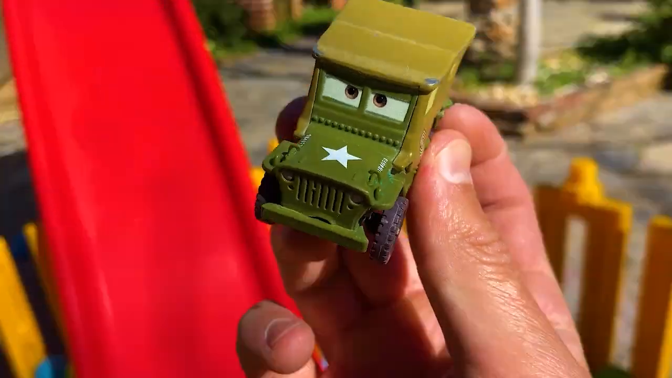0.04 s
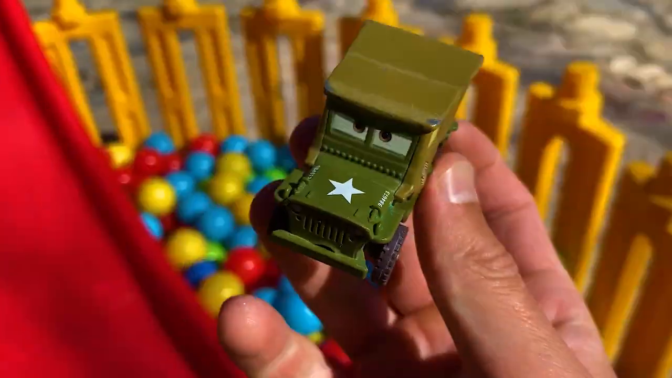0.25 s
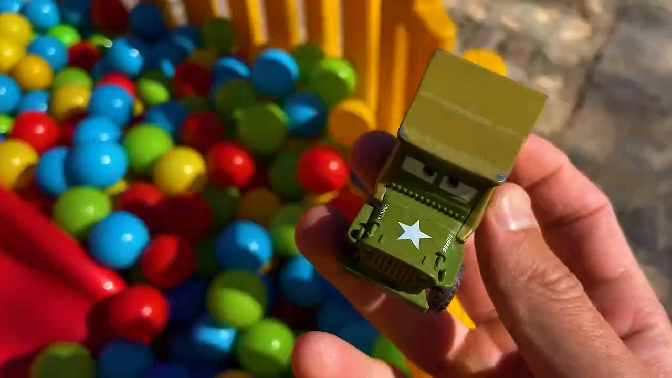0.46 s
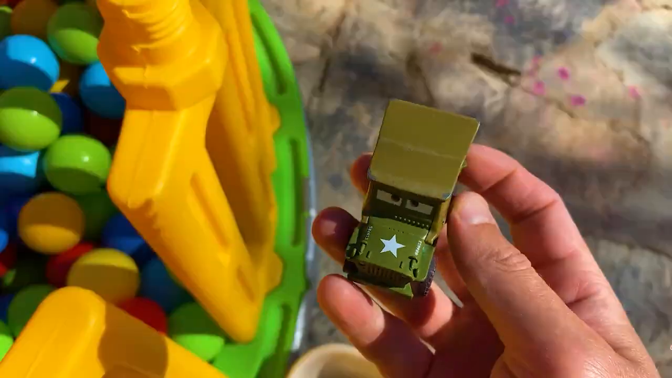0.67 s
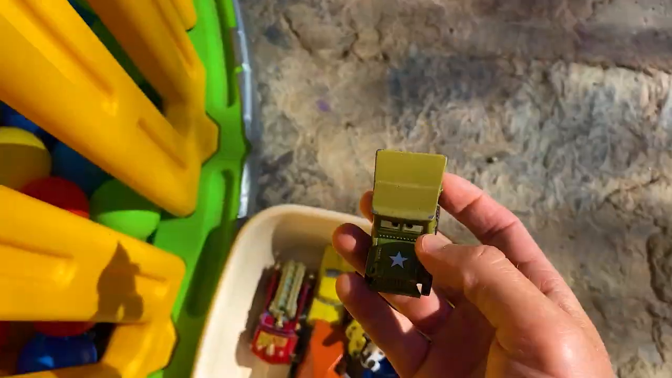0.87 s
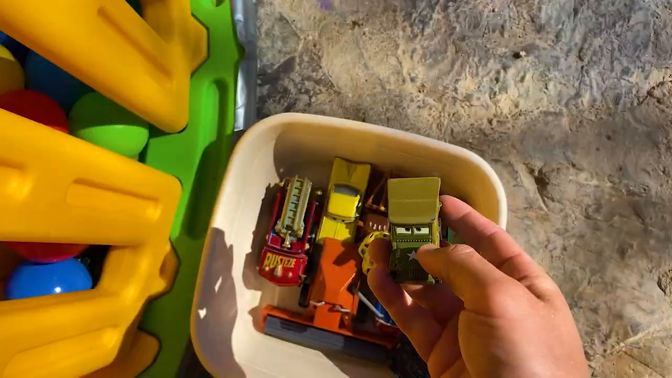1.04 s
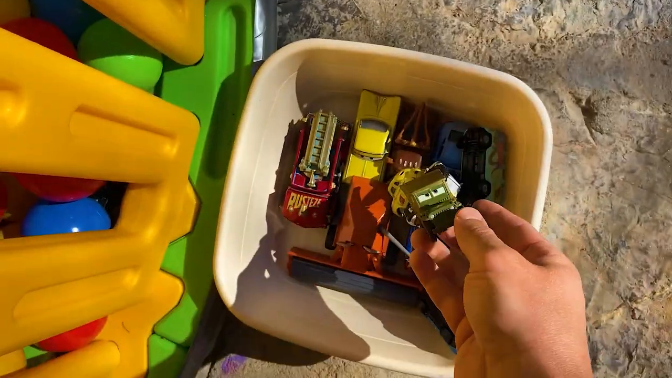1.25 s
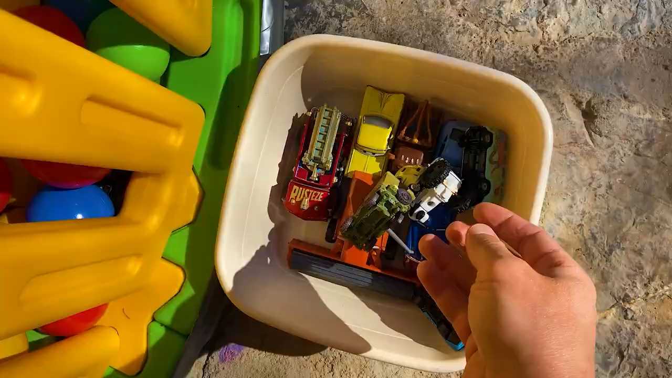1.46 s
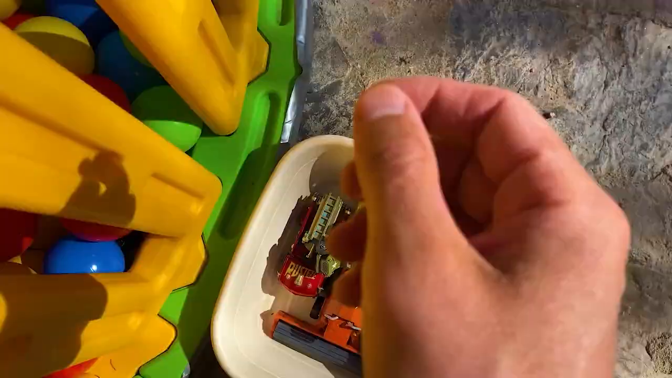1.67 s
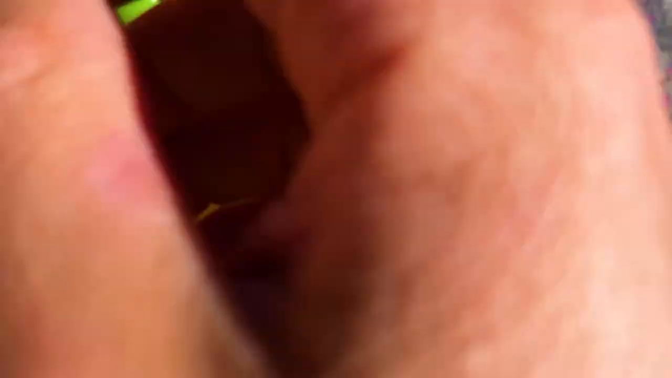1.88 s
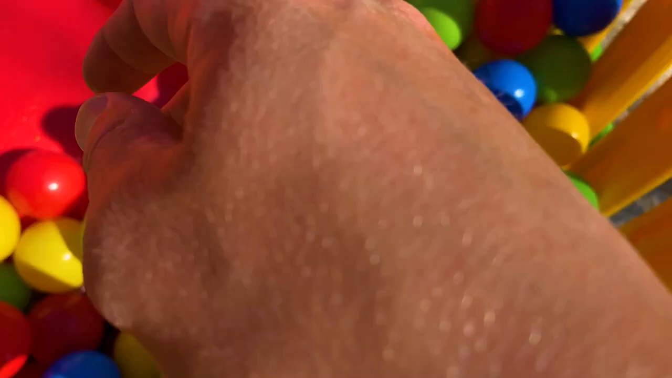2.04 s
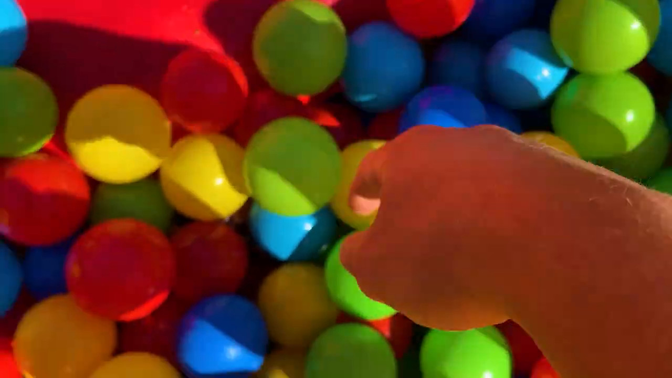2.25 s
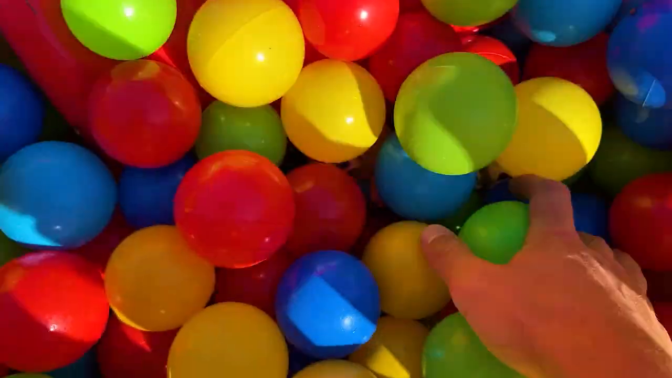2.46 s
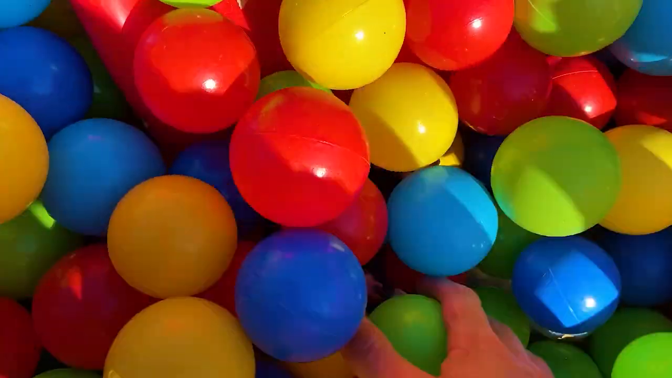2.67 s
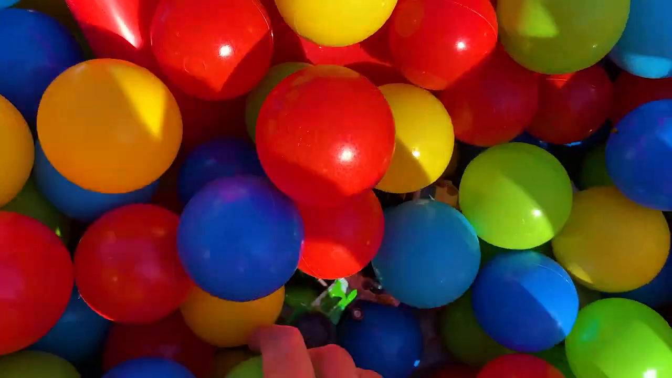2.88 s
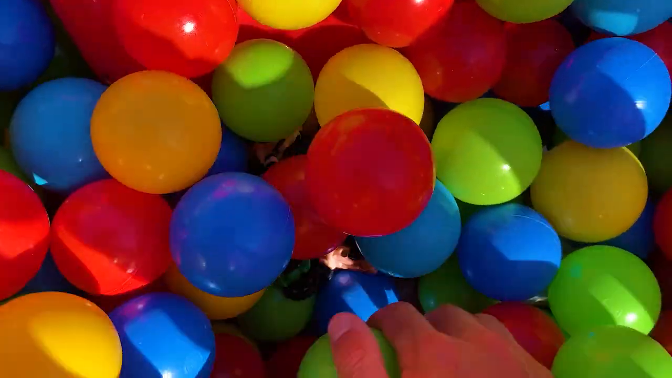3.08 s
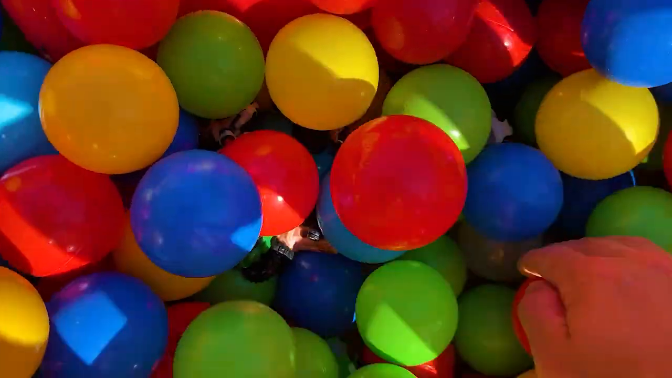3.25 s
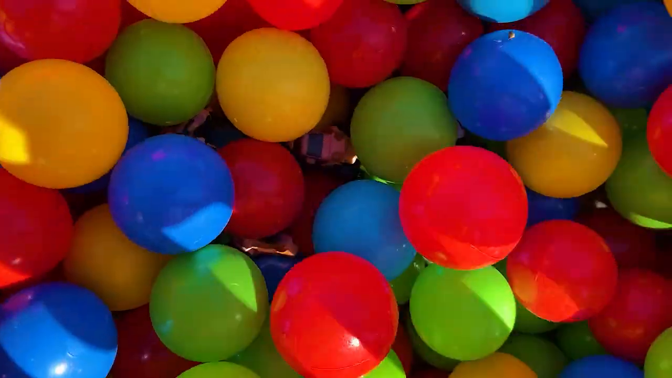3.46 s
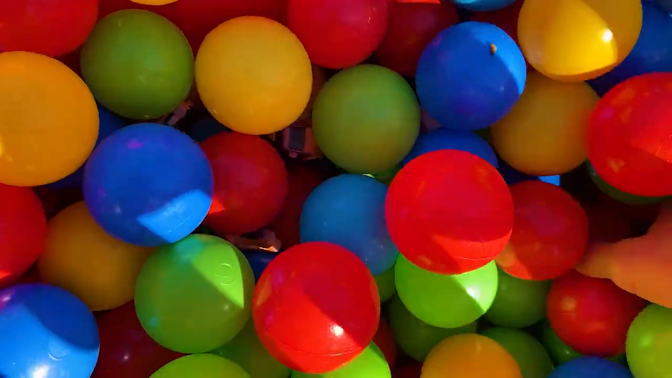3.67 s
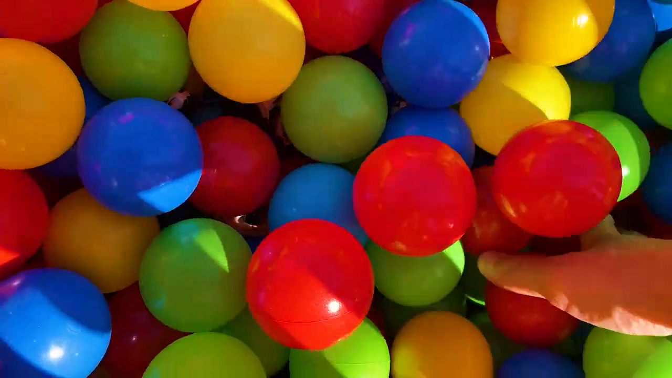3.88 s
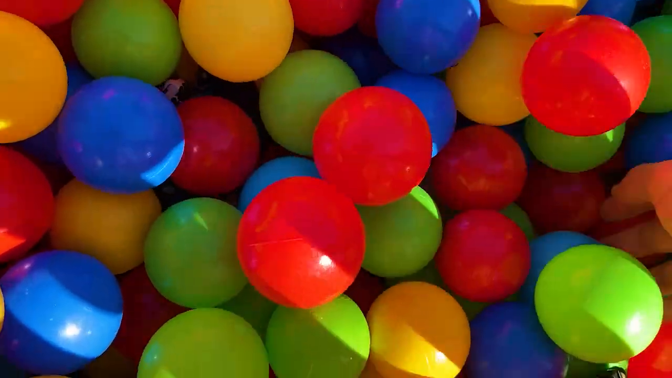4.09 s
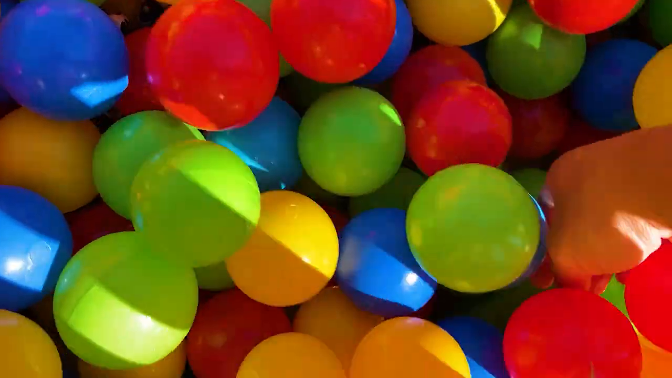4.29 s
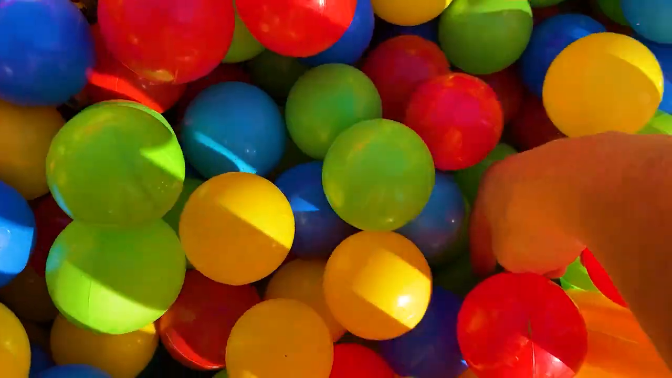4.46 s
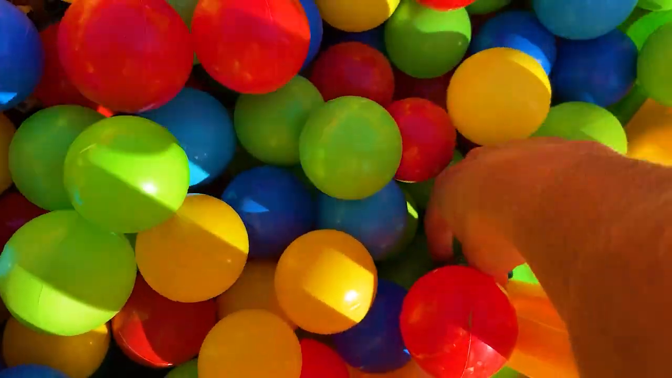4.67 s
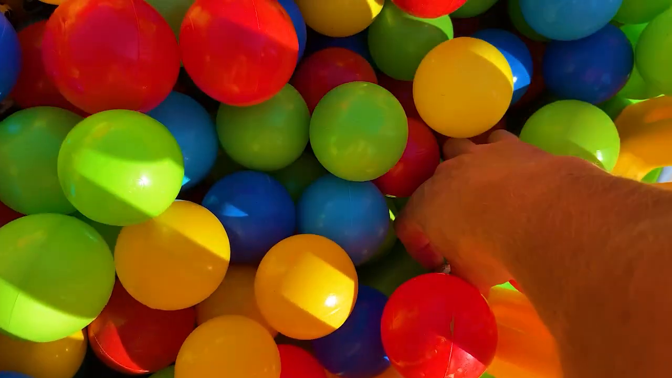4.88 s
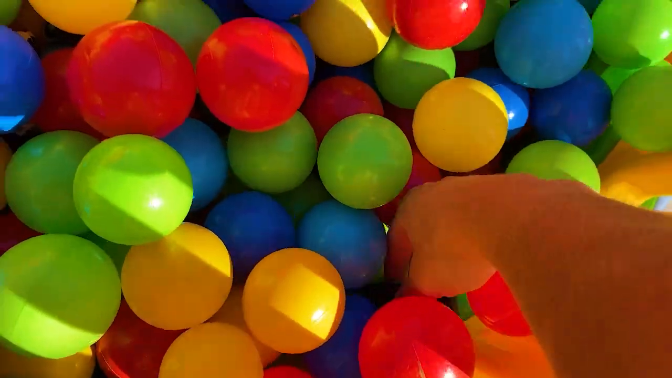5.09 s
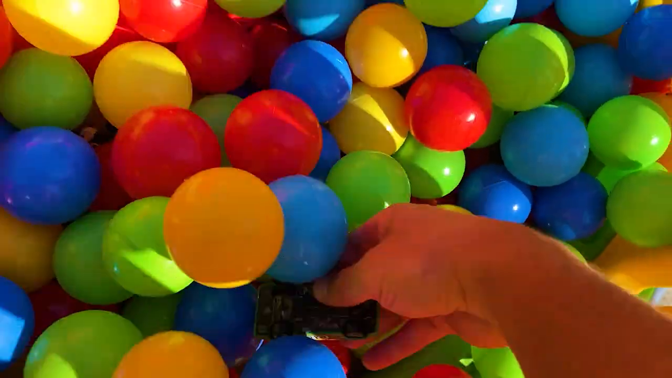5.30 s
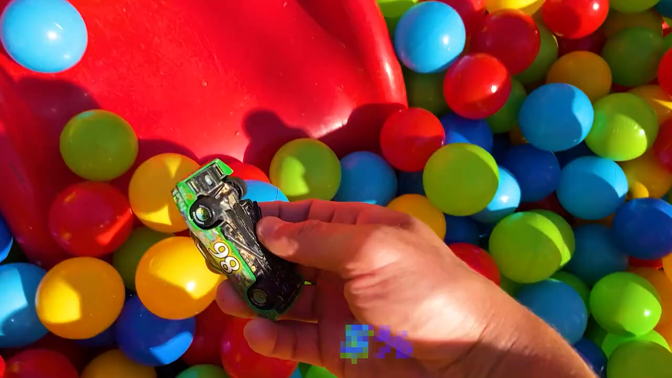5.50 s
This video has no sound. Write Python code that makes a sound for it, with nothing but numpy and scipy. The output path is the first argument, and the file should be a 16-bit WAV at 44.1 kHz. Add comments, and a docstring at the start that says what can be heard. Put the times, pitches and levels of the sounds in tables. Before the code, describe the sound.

A small metal toy car clatters into a plastic tub of others, then a hand rummages through knocking hollow plastic balls outdoors.

```python
"""Toy cars and a ball pit outdoors

Outdoors, close to the microphone, a die-cast toy car is turned in the fingers and dropped among others
in a plastic tub: blows are fading noise bands coloured by the tub, with clean decaying sines for metal.
Then a hand digs through a pit of hollow plastic balls: random contacts make them jostle and scuff,
single blows knock and ring, and wavering tones give short high rings and squeaks. Soft bumps, light wind
on the microphone, handling rumble and a faint outdoor hiss are shaped from the same stereo noise."""
import sys
import numpy as np
from scipy import signal
from scipy.fft import rfft, irfft, next_fast_len
from scipy.io import wavfile
from scipy.ndimage import uniform_filter1d

SR = 44100
rng = np.random.default_rng(int(sys.argv[2]) if len(sys.argv) > 2 else 0)


def store_wav(level_fs):
    """Save 16-bit WAV to argv[1]."""
    pcm = np.round(np.clip(np.atleast_2d(level_fs), -1, 1) * 32767)
    wavfile.write(sys.argv[1], SR, pcm.T.astype(np.int16))


N = 244040
TIME = np.arange(N) / SR
RING_S = .25  # longest stretch kept of any single blow
AGE = TIME[:int(RING_S * SR)]  # seconds since a blow
EDGES = np.geomspace(28, 18000, 24)  # noise band edges, Hz
CENTRES = np.sqrt(EDGES[1:] * EDGES[:-1])


def from_db(db):
    """Decibels to a linear gain."""
    return 10 ** (np.asarray(db) / 20)


def rms_one(x):
    """Scale a signal to rms 1."""
    return x / np.sqrt(np.mean(x ** 2) + 1e-20)


def in_time(rows):
    """Gain curves from the dB columns of a table, at -120 dB outside their span."""
    s, *columns = np.transpose(rows)
    return [from_db(np.interp(TIME, s, c, left=-120, right=-120)) for c in columns]


def per_band(points):
    """A spectrum read at the band centres, straight along log frequency."""
    hz, value = np.transpose(points)
    return np.interp(np.log(CENTRES), np.log(hz), value)


def bell(hz, steep_db):
    """Band levels in dB that fall away from hz by the square of the distance in octaves."""
    return -steep_db * np.log2(CENTRES / hz) ** 2


def swell(middle_s, half_s, db):
    """Gain of a rub that rises and falls around its middle, 1/e of its peak at half_s to either side."""
    return from_db(db) * np.exp(-((TIME - middle_s) / half_s) ** 2)


def drift(per_s):
    """A smooth random wander of spread about one, with per_s random knots a second."""
    knots = rng.standard_normal(int(N / SR * per_s) + 2)
    return np.interp(TIME * per_s, np.arange(len(knots)), knots)


def add(out, start_s, sound):
    """Mix a short sound in at its start."""
    i = max(round(start_s * SR), 0)
    out[:, i:i + sound.shape[-1]] += sound[..., :N - i]


# How alike the two microphones hear each band: pitch_hz, likeness (0 to 1)
LIKENESS = [(250, 0.97), (1300, 0.15), (4000, 0.36), (7000, 0.9)]


def noise_bands():
    """Stereo noise in bands of rms 1: a shared mid and an opposed side set how alike the channels are."""
    white, bands = rng.standard_normal((2, 2, N)), []
    for k, alike in enumerate(np.clip(per_band(LIKENESS), 0, 1)):
        band_filter = signal.butter(2, EDGES[k:k + 2], "band", fs=SR, output="sos")
        mid, side = signal.sosfilt(band_filter, white[k % 2])
        stereo = np.sqrt(1 + alike) * mid + np.sqrt(1 - alike) * side * [[1], [-1]]
        bands.append(rms_one(stereo))
    return np.array(bands)


def hump(bands, hz, steep_db):
    """Noise of rms 1 gathered around one pitch."""
    return rms_one(np.tensordot(from_db(bell(hz, steep_db)), bands, axes=1))


def resonate(x, modes):
    """The few strong resonances of a body (pitch_hz, width_hz, level_db) ring on over the rest."""
    out = x
    for hz, width, db in modes:
        r = np.exp(-np.pi * width / SR)
        b = (1 - r * r) / 2 * np.array([1, 0, -1])
        a = [1, -2 * r * np.cos(2 * np.pi * hz / SR), r * r]
        out = out + from_db(db) * signal.lfilter(b, a, x + 1e-18)
    return out


def ring_along(x, modes, db):
    """Whatever rubs or knocks a ball also sets its modes ringing; width follows from decay time."""
    return resonate(x, [(hz, np.log(1000) / (np.pi * t60), db + mode_db) for hz, mode_db, t60 in modes])


# Lean of the sound towards the left microphone: pitch_hz, left_minus_right_db
BALANCE = [(150, 0.5), (600, -4.5), (2200, -2), (6000, 0)]


def shell(bands, band_db, t60, damping, rise_s, tail_db, tail_t60):
    """One blow on a thin shell: crowded modes fade, high ones first (t60 holds at 1 kHz), over a faint tail."""
    start = rng.integers(N - len(AGE))
    life = t60 * (CENTRES[:, None] / 1000) ** -damping
    fade = from_db(-60 * AGE / life) + from_db(tail_db - 60 * AGE / tail_t60)
    modes = bands[:, :, start:start + len(AGE)] * fade[:, None]
    # every band takes its due share of the blow's energy
    share = np.sqrt((fade ** 2).sum(1) / (modes ** 2).sum(2).mean(1))
    # the less alike the channels, the more each band leans in a direction of its own
    pan_db = per_band(BALANCE) + 6 * (1 - per_band(LIKENESS)) * rng.standard_normal(len(CENTRES))
    gains = (share * from_db(band_db))[:, None] * from_db(np.outer(pan_db, [.5, -.5]))
    return np.einsum("bc,bct->ct", gains, modes) * (1 - np.exp(-AGE / rise_s))


DETUNE, SCATTER_DB = .008, 3  # spread of a mode's pitch (as a fraction) and strength from tap to tap
CONTACT_S = 0.00057  # time constant of the onset of the ring


def ping(modes, tilt_db=0, detune=DETUNE):
    """A sharp tap sets clean modes ringing, tilted in dB per octave; each channel hears its own mix."""
    hz, db, t60 = np.transpose(modes)[:, :, None]
    hz = hz * (1 + detune * rng.standard_normal(hz.shape))
    strength, phase = rng.standard_normal((2, 2, len(modes), 1))
    level_db = db + tilt_db * np.log2(hz / hz[0]) + SCATTER_DB * strength
    rings = from_db(level_db - 60 * AGE / t60) * np.sin(2 * np.pi * hz * AGE + .5 * phase)
    return rings.sum(1) * (1 - np.exp(-AGE / CONTACT_S))


def own_ring(blow, low_hz, db, sharpness, count):
    """Where a blow lands decides which few modes stand out, in the three octaves above low_hz."""
    pitches = low_hz * 2 ** (3 * (np.arange(count) + rng.random(count)) / count)
    return resonate(blow, [(hz, hz / sharpness, db) for hz in pitches]) * from_db(-db / 2)


# a weaker force makes fewer, more separate contacts: the rate goes as this power of the force
RATE_POWER = .55


def jostle(bands, spectrum, force, per_s, spread_db, t60, fits_db, count):
    """Random contacts of uneven strength, dealt among several bodies that move in fits and ring differently."""
    signs = rng.choice([-1, 1], N)
    sizes = from_db(spread_db * np.minimum(rng.exponential(1, N), 3)) * signs
    activity = from_db(fits_db * np.array([drift(per_s=33) for _ in range(count)]))
    # the push passes from body to body
    activity /= np.sqrt(np.mean(activity ** 2, axis=0))
    busy = np.maximum(force / force.max(), .06) ** RATE_POWER
    touches = rng.random(N) < busy * per_s / SR
    clicks = rms_one(sizes * touches / np.sqrt(busy)) * force * activity
    dealt, out = rng.integers(count, size=N), 0
    for k in range(count):
        # every body favours other stretches of the spectrum
        voicing_db = 5 * np.cos(2 * np.pi * (np.log2(CENTRES) / 2 + k / count))
        blow = shell(bands, per_band(spectrum) + voicing_db, t60, damping=0.15, rise_s=0.00014,
                     tail_db=-13.0, tail_t60=0.081)
        ringing = own_ring(blow, low_hz=spectrum[1][0], db=2.5, sharpness=23.0, count=7)
        body = rms_one(ringing) / np.sqrt(len(AGE))
        out = out + signal.oaconvolve((clicks[k] * (dealt == k))[None], body, axes=1)[:, :N]
    return out


# Deep rumble of handling, before the hand reaches the balls: start_s, level_db
HANDLING = [(0.0, -53.5), (0.4, -56), (0.52, -97), (1.1, -102.5), (1.3, -62), (1.9, -63), (2.4, -44.5)]
# Wind fluttering on the microphone: start_s, level_db (before a trim in air)
WIND = [(0.0, -62), (0.33, -48.5), (0.41, -37.5), (0.58, -51), (0.86, -63), (1.02, -82), (1.25, -60.5),
        (2.38, -76.5)]
# The arm swishes past on its way to the pit: middle_s, half_s, level_db
SWISH = (2.18, 0.032, -60.5)
# Colour of the open-air hiss: pitch_hz, relative_level_db
OUTDOORS = [(60, -42.5), (250, 0.5), (2000, 1), (4000, -4.5), (15000, -8.5)]
HEAP_RUMBLE_DB = -9.5  # rumble relative to the stirring


def air(bands, motion):
    """Noise humps give rumble, wind flutter and the arm's swish; a drifting hiss carries a faint high note."""
    (handling,), (flutter,) = in_time(HANDLING), in_time(WIND)
    deep = handling + from_db(HEAP_RUMBLE_DB) * motion
    rumble = deep * hump(bands, hz=100.8, steep_db=22.5)
    wind = from_db(-1.5) * flutter * hump(bands, hz=201.4, steep_db=24.5)
    swish = swell(*SWISH) * hump(bands, hz=1580, steep_db=10.5)
    hiss = rms_one(np.tensordot(from_db(per_band(OUTDOORS)), bands, axes=1))
    hiss_gain = from_db(-63.0 + drift(per_s=6.5))
    return rumble + wind + swish + hiss_gain * resonate(hiss, [(2280, 200, 6)])


# Soft low bumps: start_s, level_db (before the trim in thumps), pitch_hz
THUMPS = [(0.37, -24, 91), (0.662, -32.5, 237), (0.704, -36, 250), (0.863, -37.5, 199), (2.413, -13.5, 220),
          (2.911, -9.5, 208), (3.394, -17.5, 220), (3.615, -16.5, 296), (5.404, -17, 227),
          (5.44, -13.5, 55.4), (5.448, -10, 210)]


def thumps(bands):
    """Dull bumps close to the microphone: a slow-rising blow gathered around one low pitch."""
    out = np.zeros((2, N))
    for start_s, db, hz in THUMPS:
        bump = shell(bands, db + bell(hz, steep_db=25.5), t60=0.054, damping=0.1, rise_s=0.0028,
                     tail_db=-12, tail_t60=0.089)
        add(out, start_s, bump)
    return from_db(-5.5) * out


# Colour of a small metal car under a blow: pitch_hz, relative_level_db
CAR_COLOUR = [(50, -46), (130, -29.5), (220, -8), (600, 3.5), (1300, -10.5), (3500, -10), (6500, 2.5),
              (15000, -12)]


def car_blow(bands, db, colour, t60):
    """One blow on a small metal car: a shell in the car's colour and that of the blow."""
    return shell(bands, db + per_band(CAR_COLOUR) + per_band(colour), t60, damping=0.2, rise_s=0.0015,
                 tail_db=-30.5, tail_t60=0.29)


# Upper modes of a metal car: pitch_hz, relative_level_db, t60_s
CAR_RING = [(3475, -15, 0.0408), (4040, -15, 0.044), (6800, -6.5, .02)]


def car_tap(note_hz, tilt_db):
    """The struck car's own note and its upper modes."""
    return ping([(note_hz, 0, .024), *CAR_RING], tilt_db)


# longest first gap between contacts, and the loss at each
CHATTER_S, CHATTER_LOSS_DB = .004, 4


def chatter(start_s, db, note_hz, tilt_db):
    """A car touches down in a quick, dying run of contacts, on average ever further apart."""
    out = np.zeros((2, N))
    for k, gap in enumerate(CHATTER_S * rng.uniform(0.39, 1, size=4)):
        add(out, start_s, from_db(db - CHATTER_LOSS_DB * k) * car_tap(note_hz, tilt_db))
        start_s += gap * (k + 1)
    return out


# The toy car ticks in the fingers: start_s, level_db (before the trim in toy_cars), note_hz
TICKS = [(0.2246, -24, 1690), (0.589, -46, 1470), (0.978, -30.5, 1720), (0.995, -39, 1540),
         (1.1462, -36, 2020)]
# Colour of a tick, damped by the fingers: pitch_hz, relative_level_db
GRIP = [(700, -68), (1300, 0.5), (6000, -10.5)]
# The car clatters among the others in the tub:
# start_s, strength_db (before the trim), hardness_db, note_hz, t60_s (at 1 kHz), clean_ring_db (re strength)
CLATTER = [(1.2715, -10, 1, 2000, 0.12, -7), (1.3719, -19.5, 3.5, 1750, 0.061, -4),
           (1.399, -10, 1.5, 1880, 0.055, -6.5), (1.4127, -14.5, 7, 1700, 0.076, -6),
           (1.4298, -12, 4.5, 1820, 0.057, -2), (1.4625, -5.5, 2, 1800, 0.085, -8.5),
           (1.474, -7, -2, 2140, 0.057, -6), (1.548, -10, 8.5, 2047, 0.04, -1.5),
           (1.5781, -13.5, 2.5, 2050, 0.049, -0.5), (1.6232, -15, -2, 1370, 0.097, -26),
           (1.7333, -16, -0.5, 1310, 0.062, -3), (1.7636, -20, -0.5, 1290, 0.093, -18)]
# The car scrapes over the others as it is set down: middle_s, half_s, level_db (before the trim)
SCRAPE = (1.39, .06, -37)
# Resonances of the plastic tub: pitch_hz, width_hz, level_db
TUB_MODES = [(215, 20, 6.3), (1264, 190, 1.5)]
# Colour of scuffing contacts, for cars and balls alike: pitch_hz, relative_level_db
SCUFF = [(500, -5), (1550, 0), (2150, 6.5), (4200, 0), (7000, -2), (15000, 1.5)]
TUB_DB = -15.5  # the tub's share of each blow; less when metal meets metal hard
CAR_NOTE_WIDTH_HZ, CAR_NOTE_DB = 150, 8.5  # the car's note colours the blow: width, dB over its clean ring
SHARP_DB = 2.5


def toy_cars(bands):
    """A metal car ticks in the fingers, then scrapes and clatters among others while the tub rings under it."""
    out = jostle(bands, SCUFF, swell(*SCRAPE), per_s=300, spread_db=6.0, t60=.03, fits_db=-3.5, count=2)
    for start_s, db, note_hz in TICKS:
        tick = car_blow(bands, db, GRIP, t60=0.062)
        add(out, start_s, tick + from_db(db + 1) * car_tap(note_hz, tilt_db=1))
    for start_s, db, hard_db, note_hz, t60, ring_db in CLATTER:
        click_db = db - SHARP_DB + hard_db
        colour = [(700, TUB_DB - hard_db), (1300, -0.88), (3500, -0.94),
                  (6000, click_db), (12000, click_db + 6.5)]
        blow = car_blow(bands, db, colour, t60)
        car_note = (note_hz, CAR_NOTE_WIDTH_HZ, ring_db + CAR_NOTE_DB)
        add(out, start_s, resonate(blow, [*TUB_MODES, car_note]))
        out += chatter(start_s + 0.0016, db + ring_db, note_hz, tilt_db=0.3 * click_db)
    return from_db(-2.5) * out


# Short high rings and squeaks of the balls, including a faint skin ring near 4.3 kHz:
# start_s, level_db (before the trim in high_rings_and_squeaks), pitch_hz
HIGH_RINGS_AND_SQUEAKS = [(2.962, -21, 5860), (2.9803, -11, 6080), (4.193, -35, 4260)]


def high_rings_and_squeaks():
    """Short high rings and squeaks of the balls: a brief wavering tone with its octave swells and fades."""
    out = np.zeros((2, N))
    for start_s, db, pitch_hz in HIGH_RINGS_AND_SQUEAKS:
        wobble = rms_one(uniform_filter1d(rng.standard_normal(len(AGE)), size=24))
        phase = 2 * np.pi * np.cumsum(pitch_hz + 420 * wobble) / SR
        tone = np.sin(phase) + from_db(-10.5) * np.sin(2 * phase)
        rise = AGE / 0.0021  # peaks 2.1 ms after the start
        add(out, start_s, from_db(db - 6.5) * rise * np.exp(1 - rise) * tone)
    return out


# Modes of a ball's hollow body: pitch_hz, relative_level_db, t60_s
HOLLOW_MODES = [(377, 1, .04), (480, -4.5, 0.084), (661, -0.5, 0.13), (762, -7, 0.089), (870, -5, .07)]
# rate, level over the stirring, half the range of strength
POCKS_PER_S, POCK_DB, POCK_SPREAD_DB = 30, -5, 3


def pocks(motion):
    """Single balls drop into gaps in the heap and sound hollow, each at a slightly different pitch."""
    out = np.zeros((2, N))
    for when, size in rng.random((round(POCKS_PER_S * N / SR), 2)):
        gain = motion[int(when * N)] * from_db(POCK_DB + POCK_SPREAD_DB * (2 * size - 1.5))
        add(out, when * N / SR, gain * ping(HOLLOW_MODES, detune=0.066))
    return out


# Ball against ball or hand:
# start_s, strength_db (before the trim in knocks), hardness_db (of the treble), note_hz, t60_s (at 1 kHz)
KNOCKS = [(2.376, -30.5, 1.5, 306, 0.026), (2.4365, -21.5, 2.5, 473, 0.09), (2.5048, -16, -2.5, 1680, 0.13),
          (2.5218, -17, -16, 367, 0.076), (2.5395, -15, -1, 440, 0.024), (2.6984, -31.5, 9, 345, 0.16),
          (2.8381, -25, 5, 335, 0.13), (2.8808, -36, 14.5, 412, 0.095), (2.904, -29, 14.5, 301, 0.074),
          (3.821, -27.5, -1, 363, 0.16), (3.9428, -24.5, -1.5, 480, 0.14), (4.185, -25, -2.5, 826, .11),
          (4.338, -32.5, 7, 344, 0.085), (4.399, -25.5, 2.5, 490, 0.031), (4.6191, -23, 5, 840, 0.085),
          (4.767, -26.5, 15, 2020, 0.014), (5.001, -16, 6, 687, .1), (5.1403, -37.5, 16, 1980, 0.2),
          (5.2798, -39, 20, 1750, 0.056), (5.4453, -26, 3.5, 316, 0.034)]
# Colour of a knock: pitch_hz, relative_level_db
KNOCK_COLOUR = [(40, -66), (150, -23.5), (350, -7), (750, -1), (1700, -5), (3500, -8.5), (7000, 3),
                (15000, 1)]
# Modes of a ball's thin skin: pitch_hz, relative_level_db, t60_s
SKIN_MODES = [(2020, -0.5, 0.044), (3412, -2, 0.018), (4267, -7.5, 0.054), (7190, 2.5, 0.014)]
HOLLOW_DB, SKIN_DB = -5, -5.5  # clean ring of a knock, relative to its strength (skin: plus hardness)
CLICK_DB = -6  # a knock's click, relative to the ring of the shell


def knocks(bands):
    """Harder collisions: a shell's knock with one note standing out, over the clean ring of hollow and skin."""
    out = np.zeros((2, N))
    for start_s, db, hard_db, note_hz, t60 in KNOCKS:
        hardness = [(700, 0), (1700, hard_db), (3500, hard_db), (6000, hard_db + CLICK_DB)]
        colour = db + per_band(KNOCK_COLOUR) + per_band(hardness)
        blow = shell(bands, colour, t60, damping=0.53, rise_s=0.00076, tail_db=-21.0, tail_t60=0.12)
        add(out, start_s, resonate(blow, [(note_hz, 80, 7)]))
        hollow = from_db(db + HOLLOW_DB) * ping(HOLLOW_MODES)
        skin = from_db(db + hard_db + SKIN_DB) * ping(SKIN_MODES)
        add(out, start_s + 0.001003, hollow + skin)
    return from_db(-3.0) * out


# Longer rubs of skin on skin, swelling and fading: middle_s, half_s, level_db
RUBS = [(2.518, 0.019, -30), (3.792, 0.038, -38.5), (4.346, 0.034, -41), (4.986, 0.024, -30),
        (5.254, 0.0066, -28)]
# Colour of the soft bumps inside the heap: pitch_hz, relative_level_db
BUMP = [(85, -32), (180, 4), (380, -2), (1200, -1), (2200, -25)]
SCUFF_DB = -6  # scuffing relative to the stirring


def stirring(bands, motion):
    """Balls bump softly as the heap shifts, and their skins scuff in tiny slips that make them ring."""
    slip = from_db(SCUFF_DB) * motion + sum(swell(*rub) for rub in RUBS)
    bumps = jostle(bands, BUMP, motion, per_s=300, spread_db=0.5, t60=0.0177, fits_db=4.5, count=9)
    scuffs = jostle(bands, SCUFF, slip, per_s=1000, spread_db=2.5, t60=.05, fits_db=.5, count=8)
    return bumps + ring_along(scuffs, SKIN_MODES, db=-4.5)


# How hard the hand stirs the heap: start_s, level_db
EFFORT = [(2.38, -34), (2.57, -24.5), (2.77, -24), (3.04, -33.5), (3.14, -29), (3.43, -29), (3.52, -37.5),
          (3.75, -32), (3.8, -25.5), (3.88, -33), (4.02, -34), (4.07, -41.5), (4.23, -33.5), (4.44, -42.5),
          (4.57, -36.5), (4.7, -46), (4.82, -37), (5.09, -35), (5.28, -31), (5.53, -38.5)]


def scene():
    """The hand's effort sets the whole heap in motion; cars, bumps and air sound beside it."""
    bands, (motion,) = noise_bands(), in_time(EFFORT)
    background = air(bands, motion) + thumps(bands)
    struck = ring_along(stirring(bands, motion) + knocks(bands), HOLLOW_MODES, db=-4.5)
    pit = struck + pocks(motion) + high_rings_and_squeaks()
    return background + toy_cars(bands) + pit


# Phase between the two microphone ports in the treble: pitch_hz, left_lead_turns
PORT_TURNS = [(6500, 0), (9000, .5), (11800, 1), (13000, 1), (15200, 1.5)]
CEILING, CUTOFF_HZ = .85, 15900  # level that rounded peaks approach; top of the passband


def record(dry):
    """The right port lags in the treble; the deepest bass is thinned, peaks are rounded and the top is cut."""
    size = next_fast_len(N + len(AGE))
    turns = np.interp(np.arange(size // 2 + 1) * SR / size, *np.transpose(PORT_TURNS))
    right = irfft(rfft(dry[1], size) * np.exp(-2j * np.pi * turns), size)[:N]
    bass_cut = signal.butter(2, 28, "high", fs=SR, output="sos")
    thinned = signal.sosfilt(bass_cut, [dry[0], right])
    rounded = CEILING * np.tanh(thinned / CEILING)
    top_cut = signal.ellip(10, .2, 80, CUTOFF_HZ, fs=SR, output="sos")
    return signal.sosfilt(top_cut, rounded)


dry = scene()
out = record(dry)
store_wav(out)
```